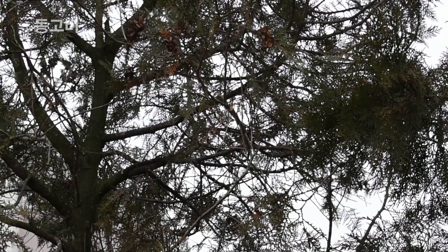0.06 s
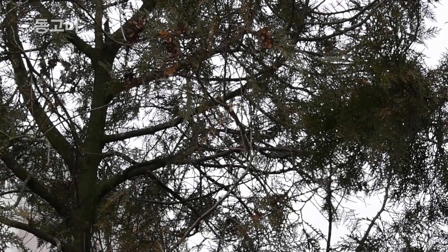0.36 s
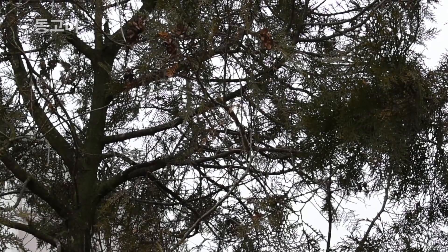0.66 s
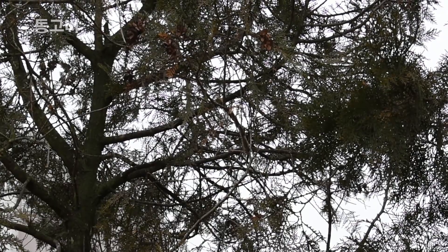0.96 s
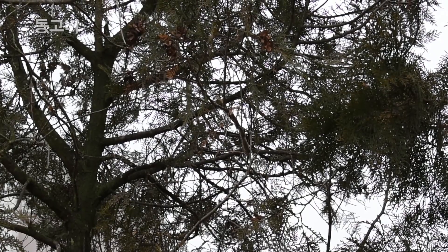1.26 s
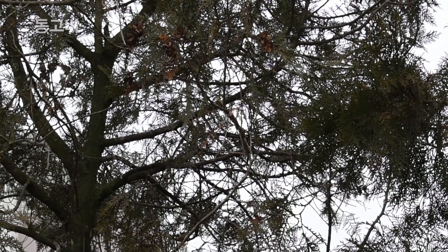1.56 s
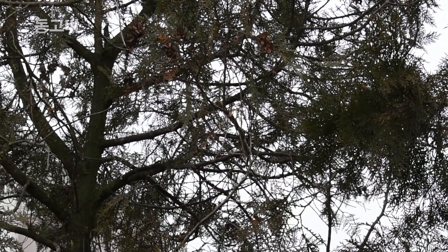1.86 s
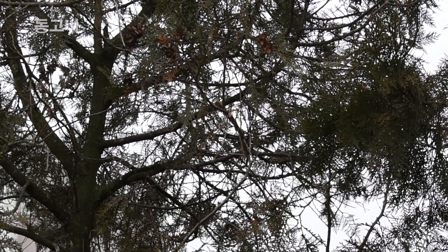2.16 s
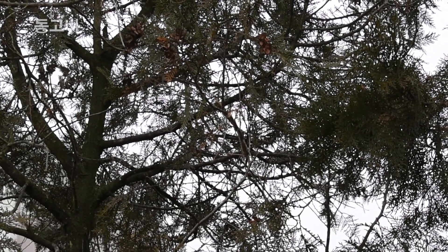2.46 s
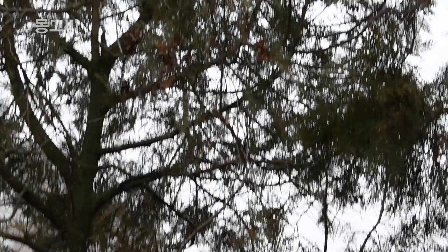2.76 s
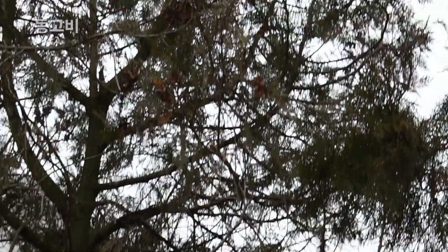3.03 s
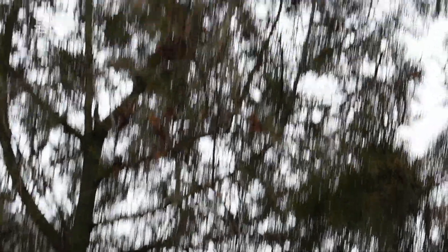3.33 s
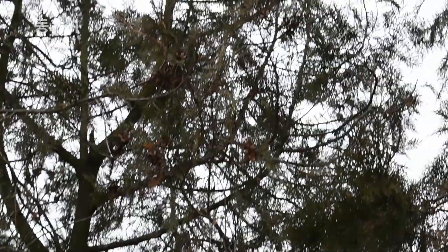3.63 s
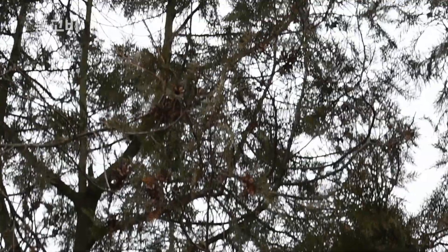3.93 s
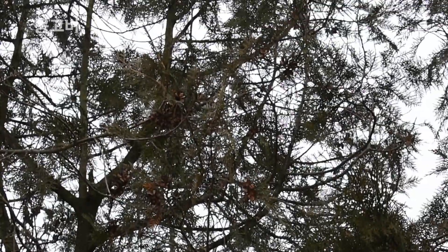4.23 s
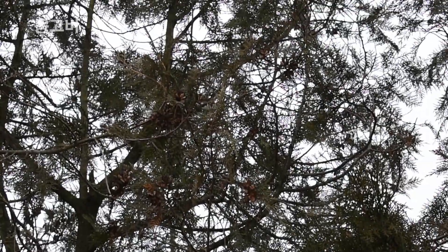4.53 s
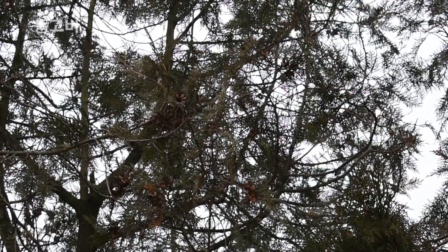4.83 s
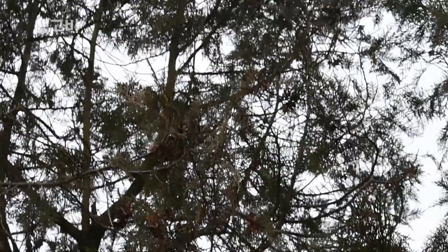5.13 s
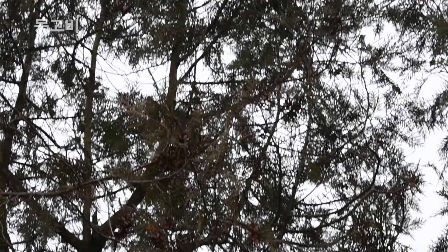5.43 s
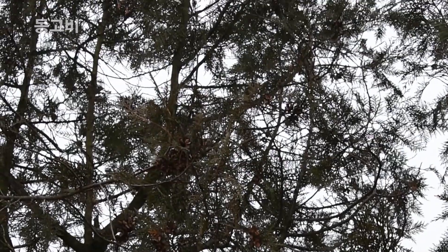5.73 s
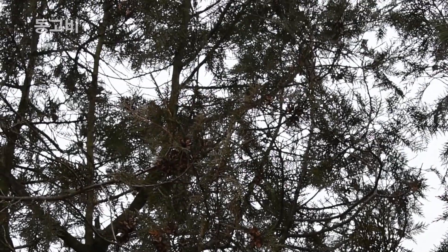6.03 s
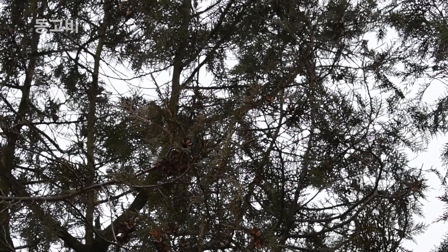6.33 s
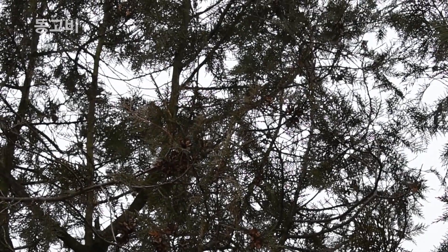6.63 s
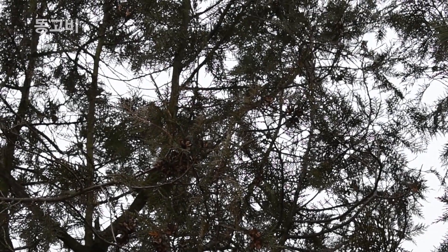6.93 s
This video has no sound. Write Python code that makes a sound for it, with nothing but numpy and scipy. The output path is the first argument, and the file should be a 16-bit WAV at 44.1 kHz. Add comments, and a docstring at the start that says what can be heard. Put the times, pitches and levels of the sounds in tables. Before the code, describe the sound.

A quiet outdoor hush runs throughout, heard among conifers through a hand-held stereo microphone. A few faint ticks sound close by, and from about 0.7 seconds small birds chatter softly to the left in short warbles and rasps. At 1.3 and 1.55 seconds one small bird gives two loud, thin, very high whistles, each brief, rising slightly and dropping sharply at the end. These are the loudest sounds. After a lull with only light ticks, the faint chatter returns at about 3.4 seconds, while soft rustling and ticking swell near the microphone, peaking around 3.7 seconds. One sharp snap comes at 4.3 seconds. Scattered slurred and raspy chirps continue until about 6 seconds, with a last faint chirp near 6.7 seconds. The trees give the calls a short echo.

```python
"""Birdsong in a conifer

A small bird gives two loud, thin, rising whistles, almost pure tones from its syrinx; others further
left chatter in warbles, slurs and rasps, harmonic tones roughened by random modulation. Trunks and
twigs scatter the calls into a short tail over a quiet outdoor hush. Near the hand-held stereo
microphone there is soft rustling, with faint ticks and one sharp snap: impulses ringing resonances."""
import sys
import numpy as np
from scipy import signal
from scipy.fft import rfft, irfft
from scipy.io import wavfile
from scipy.ndimage import uniform_filter1d

SR = 44100
rng = np.random.default_rng(int(sys.argv[2]) if len(sys.argv) > 2 else 0)


def to_wav(s):
    """Save 16-bit WAV."""
    ch = np.atleast_2d(s).T  # columns
    pcm = np.round(np.clip(ch, -1, 1) * 32767)  # PCM
    wavfile.write(sys.argv[1], SR, pcm.astype(np.int16))


N = 307818
TIME = np.arange(N) / SR


def undb(db):
    """Amplitude ratio of a level in decibels."""
    return 10 ** (np.asarray(db) / 20)


def unit(x):
    """Normalisation to unit rms."""
    return x / np.sqrt(np.mean(x ** 2))


def add(track, start_s, sound):
    """Superposition: a sound adds to the track from start_s on."""
    i = max(int(start_s * SR), 0)
    track[i:i + len(sound)] += sound[:max(N - i, 0)]


def wander(rate_hz, size):
    """Random modulation: Gaussian values joined by straight lines, with a deviation near 1."""
    steps = np.arange(size) * rate_hz / SR
    values = rng.standard_normal(size // 8 + 2)
    return 1.2 * np.interp(steps, np.arange(len(values)), values)


def colour(x, spectrum):
    """Zero-phase filtering by a curve of (f/Hz, gain/dB) points."""
    hz, db = np.transpose(spectrum)
    bins = np.maximum(np.fft.rfftfreq(N, 1 / SR), 1)
    return irfft(rfft(x) * undb(np.interp(np.log(bins), np.log(hz), db)), N)


def diffuse_field():
    """Spatial coherence follows a sinc law: the two ports agree in the bass, hardly in the treble."""
    coherence = .98 * np.sinc(np.fft.rfftfreq(N, 1 / SR) / 1500)
    mid = irfft(rfft(rng.standard_normal(N)) * np.sqrt(1 + coherence), N)
    side = irfft(rfft(rng.standard_normal(N)) * np.sqrt(1 - coherence), N)
    return np.array([mid + side, mid - side])


# Spectral density of the hush: f/Hz, relative level/dB
HUSH_SPECTRUM = [(24, -69), (40, -45.5), (120, -48.5), (183, -38.5), (294, -27), (438, -21.5), (653, -8.5),
                 (722, -6), (797, -4), (1050, 0), (2270, -3.5), (4680, -6), (6810, -12.5), (9410, -10.5),
                 (13300, -22.5), (15500, -24)]
def hush(swell_db):
    """Distant sound from all directions forms a diffuse noise whose level drifts."""
    level_db = -61.5 + 0.75 * swell_db + 0.78 * wander(9.9, N)
    return unit(colour(diffuse_field(), HUSH_SPECTRUM)) * undb(level_db)


# Spectral density of the rustle: f/Hz, relative level/dB
RUSTLE_SPECTRUM = [(200, -40), (800, -11.5), (2000, 5), (4000, -1.5), (8500, 6), (11000, -4), (15500, -14)]
def rustle(motion):
    """Handling noise grows with the motion of the hand; fast amplitude modulation makes it grainy."""
    grains = undb(2.5 * wander(500, N) + 1.0 * wander(25, N))
    return unit(colour(diffuse_field() * grains, RUSTLE_SPECTRUM)) * motion * undb(10.5)


def burst(hz, t60, spread):
    """Impulsive excitation: decaying noise drives a resonance from hz / spread to hz * spread."""
    t = np.arange(SR // 10) / SR
    attack = 1 - np.exp(-t / 0.000074)
    force = rng.standard_normal(len(t)) * undb(-60 * t / t60) * attack
    resonance = signal.butter(2, [hz / spread, hz * spread], "band", fs=SR, output="sos")
    return signal.sosfilt(resonance, force) * np.sqrt(SR / (2 * hz))


def crackle(motion, per_s=30):
    """A random point process of faint ticks, scaled by the motion: most are tiny, a few stand out."""
    out = np.zeros((2, N))
    for when, chance in rng.random((int(per_s * N / SR), 2)):
        size = undb(5.5 * np.minimum(-np.log(1 - chance), np.pi))
        for port in out:
            add(port, when * N / SR, size * burst(hz=7340, t60=0.015, spread=1.75))
    return out * motion * undb(7)


# Slow envelopes of the background: t/s, air level/dB, rustle level/dB (both relative)
SWELLS = [(0.0, -71, -79.5), (0.56, -73.5, -74), (0.95, -69, -79), (1.32, -72, -76.5), (1.5, -70.5, -89),
          (1.79, -71.5, -76.5), (2.29, -69.5, -71), (2.72, -70, -73.5), (3.07, -68.5, -70.5),
          (3.6, -69, -66), (3.73, -65.5, -61.5), (3.87, -70, -67), (4.18, -67, -68.5), (4.61, -71, -72.5),
          (5.25, -69, -74), (5.62, -71, -74), (5.89, -69.5, -76.5), (6.98, -71, -75.5)]
def background():
    """Incoherent sources add: a lasting hush, and handling noise that stops when the hand is still."""
    times, air_db, rustle_db = np.transpose(SWELLS)
    swell_db = np.interp(TIME, times, air_db - np.percentile(air_db, 20))
    power = undb(rustle_db) ** 2
    excess_power = np.maximum(power - np.percentile(power, 20), 0)
    motion = np.sqrt(np.interp(TIME, times, excess_power))
    return hush(swell_db) + rustle(motion) + crackle(motion)


# The clearer ticks and the snap: t/s, crack gain/dB, knock gain/dB, 60 dB decay time of the crack/s
IMPACTS = [ (.034, -56, -43.5, 0.0032), (.565, -54, -65, 0.036), (0.597, -46.5, -61, 0.024),
           (0.948, -69, -47, 0.014), (1.003, -72, -50, .015), (1.208, -46, -46.5, 0.023),
           (1.317, -44, -45.5, .009), (2.0004, -48, -48, 0.0082), (2.023, -46.5, -58.5, .008),
           (2.323, -49.5, -49, 0.014), (2.121, -65, -55.5, 0.032), (2.451, -51, -58, 0.036),
           (3.303, -60, -49, 0.017), (3.42, -45, -62, .01), (3.66, -42, -48, 0.077),
           (3.783, -37, -54, 0.051), (3.827, -43, -53.5, 0.047), (3.873, -30.5, -42, 0.0078),
           (4.101, -39.5, -47, 0.03), (4.156, -42.5, -58.5, 0.058), (4.3017, -21.5, -34, 0.004),
           (4.3032, -26.5, -32, 0.01), (4.461, -42, -53, 0.016)]
def ticks():
    """Damped resonances: each tick is a bright crack over a duller knock that rings longer."""
    out = np.zeros((2, N))
    for start_s, crack_db, knock_db, crack_t60 in IMPACTS:
        knock_t60 = 1.9 * crack_t60
        body = burst(hz=461, t60=knock_t60, spread=1.1) * undb(-23)  # alike at both ports
        for port in out:
            crack = burst(hz=7340, t60=crack_t60, spread=1.41)
            knock = burst(hz=1500, t60=knock_t60, spread=1.635) + body
            add(port, start_s, crack * undb(crack_db) + knock * undb(knock_db))
    return out


def trees(x, wet_db, t60, first_s, build_s):
    """Scattering by trunks and twigs: echoes, different at each port, build up and decay."""
    t = np.arange(SR) / SR
    echoes = rng.standard_normal((2, SR)) * undb(3.93 * rng.standard_normal((2, SR)))
    echoes *= np.clip((t - first_s) / build_s, 0, 1) * undb(-60 * t / t60)
    echoes /= np.sqrt(np.sum(echoes ** 2, axis=1, keepdims=True))
    return undb(wet_db) * signal.fftconvolve(x[None], echoes, axes=1)[:, :N]


def syrinx(hz, overtone_db):
    """Periodic vibration gives a harmonic series, changing by overtone_db per harmonic."""
    phase = 2 * np.pi * np.cumsum(hz) / SR
    return sum(undb(overtone_db * (k - 1)) * np.sin(k * phase) * (k * hz < SR / 2) for k in range(1, 6))


def glide(contour, fade_s):
    """Instantaneous frequency and amplitude along a contour, faded at both ends."""
    times, hz, db = np.transpose(contour)
    t = np.arange(times[0], times[-1], 1 / SR)
    fade = np.clip(np.minimum(t - t[0], t[-1] - t) / fade_s, 0, 1)
    return np.interp(t, times, hz), fade * undb(np.interp(t, times, db))


def arch(progress):
    """A half-sine envelope rises and falls as progress goes from 0 to 1."""
    return np.maximum(np.sin(np.pi * progress), 0)


def chirp(hz, bright_db, roughness):
    """Random frequency and amplitude modulation spread each harmonic into noisy sidebands."""
    size = len(hz)
    overtone_db = np.minimum(bright_db - 4 - 5.5 * np.log2(hz / 1730), 1)  # low notes rich, high pure
    jitter = 1 + 0.075 * roughness * wander(900, size)
    flutter = undb(2 * roughness * wander(400, size))
    rasp = 1 + 1.5 * roughness * wander(1800, size)
    return syrinx(hz * jitter, overtone_db) * flutter * rasp


# Warbles: brightness/dB, roughness, leftward (0-1), contour of (t/s, f/Hz, source level/dB)
WARBLE_CONTOURS = [ (-8, .36, 1, [(.72, 4194, -67), (.752, 4075, -59.5), (.769, 4270, -42),
                   (.786, 6870, -49), (.80, 6800, -43), (.824, 5414, -44.5), (.845, 2870, -53.5),
                   (.872, 2500, -39)]), (-8.5, 0.23, 1, [(.872, 3190, -59), (.881, 3750, -44.5),
                   (.897, 2748, -47), (.917, 2900, -53), (.944, 4113, -37.5), (.953, 1950, -38.5),
                   (.97, 1430, -38), (.992, 1268, -41.5)]), (-0.5, 0.18, 1, [(1.578, 1858, -50),
                   (1.592, 1611, -39), (1.62, 2033, -43), (1.635, 2900, -37), (1.66, 2677, -34),
                   (1.677, 1830, -46), (1.696, 1961, -42.5), (1.722, 1530, -40), (1.74, 1260, -53)]),
                   (0.5, 0.23, 1, [(3.43, 1512, -45.5), (3.455, 1859, -40), (3.468, 3440, -37),
                   (3.479, 2499, -40.5), (3.497, 3315, -35), (3.545, 2684, -39), (3.562, 1840, -37.5),
                   (3.589, 1250, -47)]), (3, 0.32, 0.8, [(5.63, 1547, -47), (5.648, 1598, -42),
                   (5.667, 1864, -42.5), (5.69, 1869, -40), (5.706, 1547, -44), (5.724, 1416, -48.5),
                   (5.733, 1194, -50)])]
def warbles():
    """Frequency modulation: in each warble one voice follows a smoothed, winding contour."""
    for bright_db, roughness, leftward, contour in WARBLE_CONTOURS:
        hz, amplitude = glide(contour, fade_s=0.0045)
        smooth_hz = uniform_filter1d(hz, size=350)
        yield contour[0][0], leftward, chirp(smooth_hz, bright_db, roughness) * amplitude


# Slurs and rasps, some sung over a warble:
# t/s, duration/s, centre f/Hz, glide/octaves, source level/dB, brightness/dB, roughness, leftward (0-1)
SLUR_NOTES = [ (0.319, .06, 4860, 0.37, -61, -8, 0.7, 0.6),
              (0.789, .034, 4590, -0.11, -49.5, -8, 0.38, 0.9),
              (.783, 0.052, 2700, -0.42, -43.5, 0.5, 0.52, 0.9),
              (0.787, 0.057, 1950, -0.77, -38.5, -8.5, 0.6, 0.84),
              (1.087, 0.17, 1932, -0.02, -50, -4, 0.45, 1),
              (1.577, .034, 5155, 0.26, -42, -11.5, 0.3, 0.95), (1.606, 0.033, 3950, 0.2, -40, -6, 0.42, 1),
              (1.811, 0.041, 2800, -0.19, -54.5, -16, 0.32, 1),
              (3.401, .014, 4770, -0.45, -48, -5.5, .2, 0.9), (3.424, .028, 4880, 0.25, -46.5, -6, 0.65, 1),
              (3.481, 0.025, 4080, 0.12, -40.5, -16, 0.2, .95),
              (3.597, 0.023, 5500, -0.52, -39.5, -10, 0.2, 1),
              (3.598, 0.031, 3450, -0.29, -42, 3, 0.23, 0.93), (3.625, .04, 4650, -0.014, -43, -9, 0.44, 1),
              (3.665, .047, 3700, -.65, -38.5, -10, .35, 0.95),
              (3.655, .036, 4050, .15, -43.5, -10, 0.27, 0.87),
              (3.734, 0.079, 3300, 0.26, -51, -11.5, 1, 0.7),
              (3.811, .06, 3100, -0.51, -44, -5.5, 0.7, 0.8),
              (3.879, 0.074, 3100, -0.29, -44, -14, 0.5, 0.72),
              (4.054, 0.052, 3154, -0.67, -43, -9, 0.35, 0.91),
              (4.101, 0.028, 3310, .25, -44, -7, 0.2, 0.9),
              (4.121, 0.045, 3390, -0.47, -42, -14, 0.42, 0.8),
              (4.483, 0.061, 6250, -.25, -49.5, -3.5, 0.4, 0.89),
              (4.607, .13, 6350, 0.14, -50.5, -4, 0.83, 0.94),
              (4.691, 0.081, 4350, -0.15, -57.5, -8, .5, 0.9),
              (4.755, .076, 5250, -1.4, -50.5, -10, 0.59, 1), (4.882, .044, 1950, -.8, -37, -8, 0.45, 0.6),
              (4.888, 0.065, 2450, -.35, -46, -9, 0.91, 0.58),
              (5.131, 0.12, 1965, 0.15, -44, -9, 0.23, 0.68),
              (5.233, .06, 1940, -0.35, -43, -8.5, .8, 0.63),
              (5.442, .055, 1750, 0.43, -38, -3.5, 0.56, 0.71), (5.471, .06, 3615, 0.2, -47, -7, 0.68, 1),
              (5.491, .04, 1793, -0.78, -31, -10, 0.68, 0.88),
              (5.483, .055, 7500, 0, -42.5, -7, 1.08, 0.84), (5.651, .04, 5500, -0.081, -38, -3, 0.34, 0.6),
              (5.675, .055, 5330, 0.0091, -41.5, 6.5, 0.3, .65),
              (5.676, .056, 3470, -0.66, -37.5, -4.5, 0.33, 0.71),
              (5.679, 0.042, 2650, 0.015, -41.5, 2.5, 0.42, 0.75),
              (5.938, 0.12, 3400, -0.44, -54.5, -2.5, 0.89, 0.9),
              (6.741, 0.081, 2750, 1, -50.5, -8.5, 0.42, 0.27),
              (6.759, .068, 4120, 0.27, -54, -8, 0.37, 0.32)]
def slurs(sag_octaves=0.1):
    """Short exponential frequency sweeps, bent downward at both ends; the rough ones are rasps."""
    for start_s, length_s, centre_hz, octaves, db, bright_db, roughness, leftward in SLUR_NOTES:
        progress = np.linspace(0, 1, int(length_s * SR))
        hz = centre_hz * 2 ** (octaves * (progress - .5) - sag_octaves * (2 * progress - 1) ** 2)
        envelope = arch(progress) ** 0.6 * undb(db)
        yield start_s, leftward, chirp(hz, bright_db, roughness) * envelope


# Frequency response of the chattering birds' throats: f/Hz, gain/dB
THROAT_RESPONSE = [(300, -45), (900, -17), (1700, -15.5), (2500, -3.5), (3300, -2), (4300, 0), (5500, -6),
                   (7500, -9.5), (13000, -19)]
def chatterers(full_left_lag_s=0.00025, full_left_db=5):
    """Source and filter: throats shape the notes; time and level differences place them to the left."""
    voice, direct = np.zeros(N), np.zeros((2, N))
    for start_s, leftward, note in [*warbles(), *slurs()]:
        left_gain = undb(leftward * full_left_db / 2)
        add(voice, start_s, note)
        add(direct[0], start_s, note * left_gain)
        add(direct[1], start_s + leftward * full_left_lag_s, note / left_gain)
    voice = colour(voice, THROAT_RESPONSE)
    near_twigs = trees(voice, wet_db=-9, t60=0.07, first_s=0.00072, build_s=0.002)
    far_trunks = trees(voice, wet_db=-8, t60=0.58, first_s=0.0064, build_s=0.017)
    return colour(direct, THROAT_RESPONSE) + near_twigs + far_trunks


def place(x, left_db, lag_samples):
    """Direction cues: a level difference between the ports and a delay at the right one."""
    return np.array([x * undb(left_db / 2), np.roll(x, lag_samples) * undb(-left_db / 2)])


def voice_break(hz, top_sample, width_s=0.003, jitter_hz=600):
    """Period doubling: at the top of a whistle the tone breaks briefly into half-harmonics."""
    half_phase = np.pi * np.cumsum(hz + jitter_hz * wander(1500, len(hz))) / SR
    from_top_s = (np.arange(len(hz)) - top_sample) / SR
    envelope = np.exp(-(from_top_s / width_s) ** 2) * undb(-52.5)
    return (np.sin(half_phase) + np.sin(3 * half_phase)) * envelope


def second_voice(target_hz, length_s=0.0068, rise_octaves=0.23):
    """Biphonation: the bird's second voice slides up into the note."""
    progress = np.linspace(0, 1, int(length_s * SR))
    hz = target_hz * 2 ** (-rise_octaves * (1 - progress) ** 2)
    return syrinx(hz, overtone_db=-19) * arch(progress) * undb(-28)


# The two whistles, one contour each: t/s, f/Hz, source level/dB
WHISTLE_CONTOURS = [
    [(1.311, 6870, -43), (1.318, 7450, -31), (1.333, 7603, -17.5), (1.368, 7680, -14), (1.395, 7900, -16),
     (1.417, 7980, -15), (1.438, 8470, -16.5), (1.443, 7620, -21.5), (1.450, 4700, -42.5)],
    [(1.539, 6790, -40.5), (1.547, 7040, -25), (1.557, 7326, -14.5), (1.585, 7485, -15),
     (1.606, 7740, -12.5), (1.634, 7914, -14.5), (1.658, 8140, -21), (1.675, 8350, -19.5),
     (1.683, 6750, -40)],
]
def whistler():
    """Nearly sinusoidal vibration: each whistle rises, then drops sharply as the beak closes."""
    voice = np.zeros(N)
    for contour in WHISTLE_CONTOURS:
        start_s = contour[0][0]
        hz, amplitude = glide(contour, fade_s=0.002)
        jitter_hz = 8 + 55 * np.linspace(0, 1, len(hz)) ** 2  # less steady as the note climbs
        unsteady_hz = hz + jitter_hz * wander(600, len(hz))
        add(voice, start_s, syrinx(unsteady_hz, overtone_db=-45) * amplitude)
        add(voice, start_s, voice_break(unsteady_hz, top_sample=np.argmax(hz)))
        add(voice, start_s + 0.0091, second_voice(target_hz=contour[2][1]))
    direct = place(voice, left_db=-3.4, lag_samples=0)
    # interference: one echo from the side beats against the rising pitch
    echo = place(np.roll(voice, int(0.033 * SR)), left_db=4, lag_samples=3) * undb(-22)
    near_twigs = trees(voice, wet_db=-7, t60=0.075, first_s=0.0026, build_s=0.004)
    far_trunks = trees(voice, wet_db=-18.5, t60=0.54, first_s=0.023, build_s=0.016)
    return direct + echo + near_twigs + far_trunks


def scene():
    """Linear superposition of the birds, the ticks and the background."""
    return whistler() + chatterers() + ticks() + background()


def record(dry):
    """Band limiting: the recorder cuts the bass gently and the top steeply."""
    bass_cut = signal.butter(1, 170, "high", fs=SR, output="sos")
    top_cut = signal.ellip(10, .2, 80, 15750, fs=SR, output="sos")
    return signal.sosfilt(top_cut, signal.sosfilt(bass_cut, dry))


dry = scene()
out = record(dry)
to_wav(out)
```